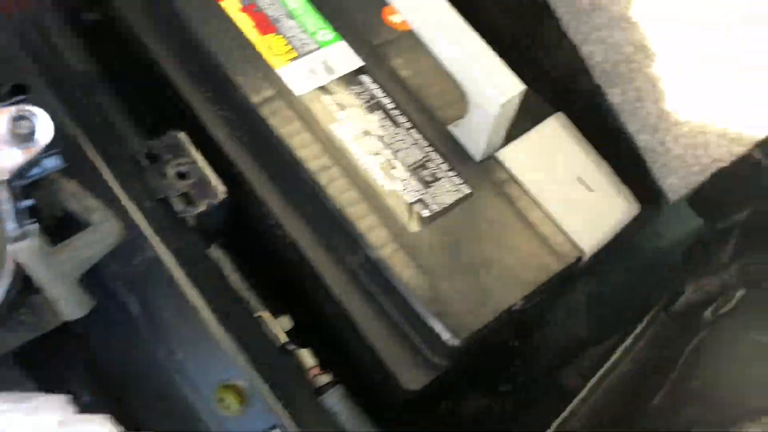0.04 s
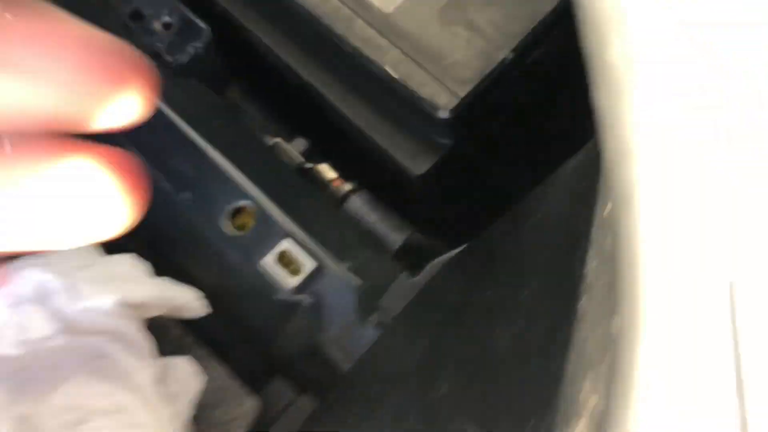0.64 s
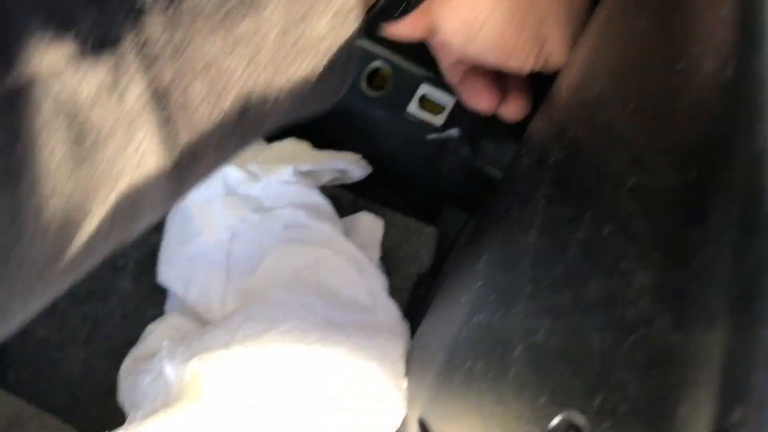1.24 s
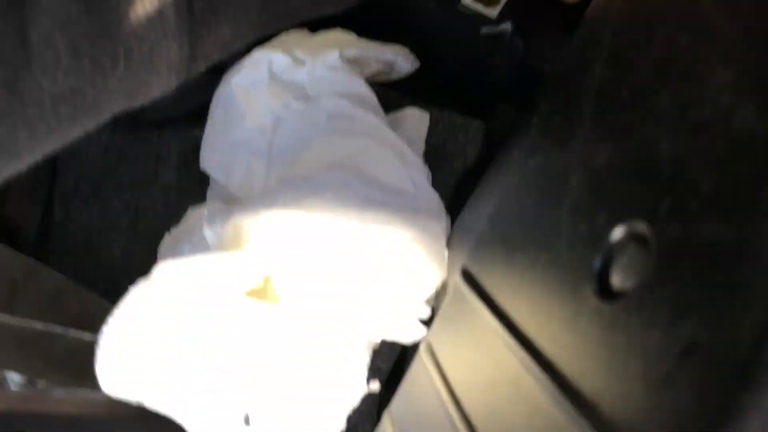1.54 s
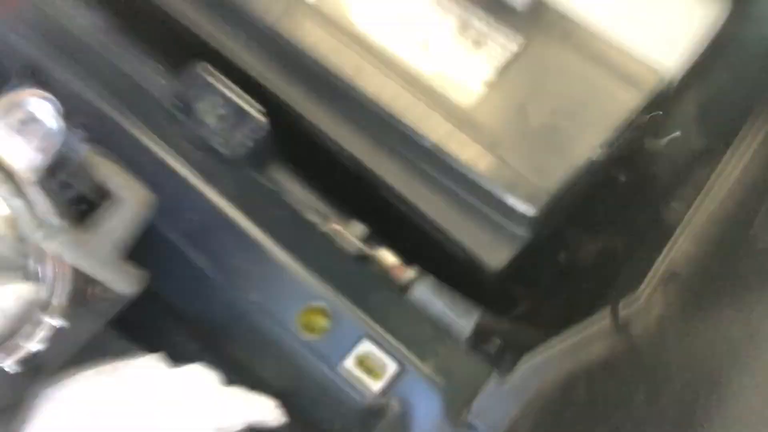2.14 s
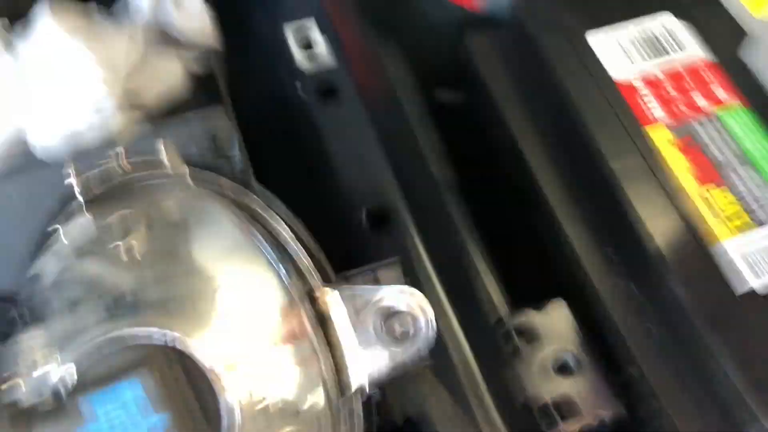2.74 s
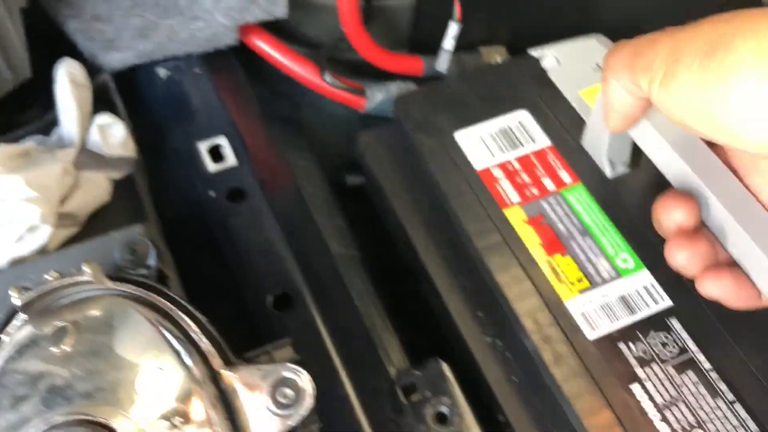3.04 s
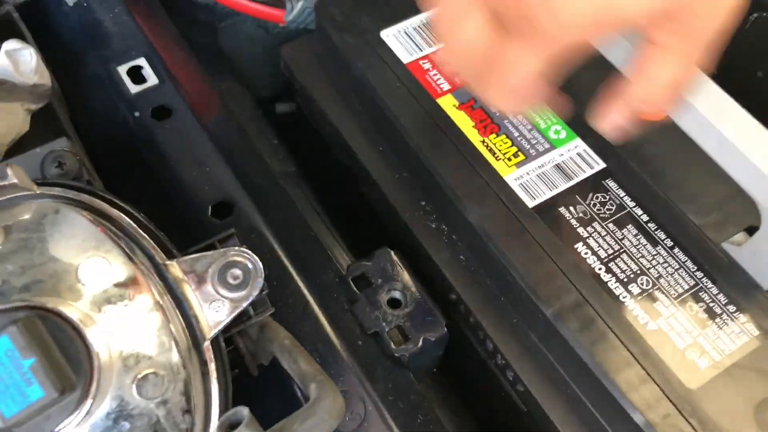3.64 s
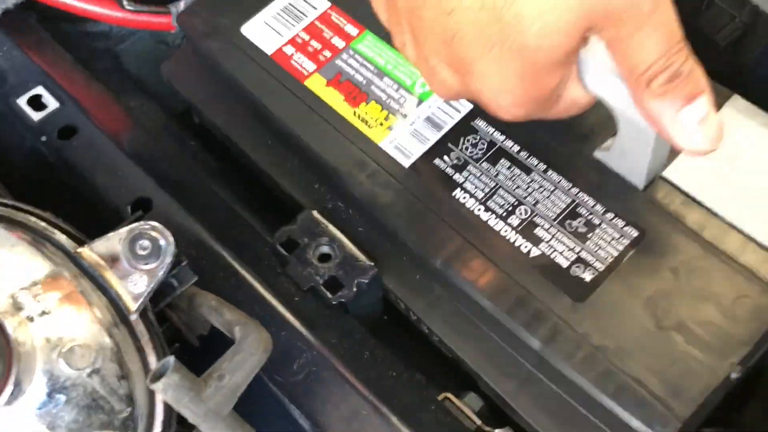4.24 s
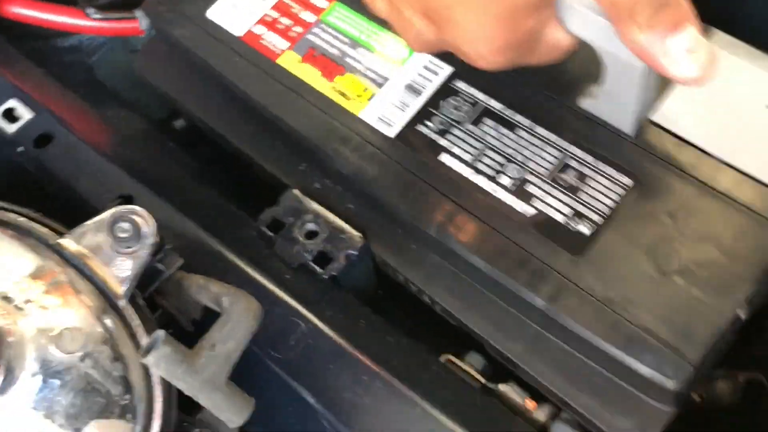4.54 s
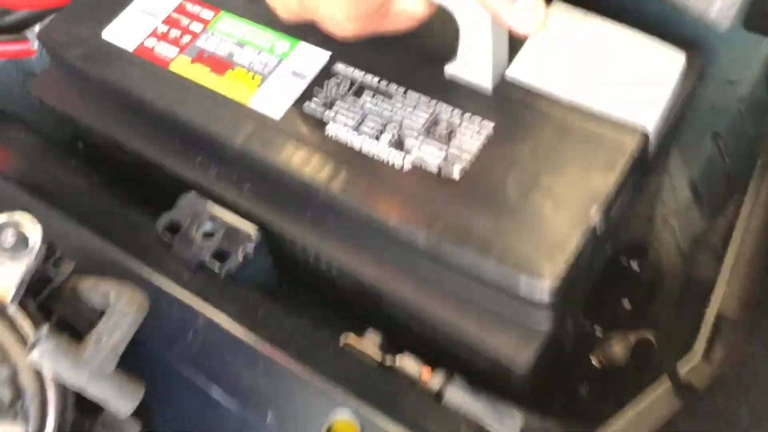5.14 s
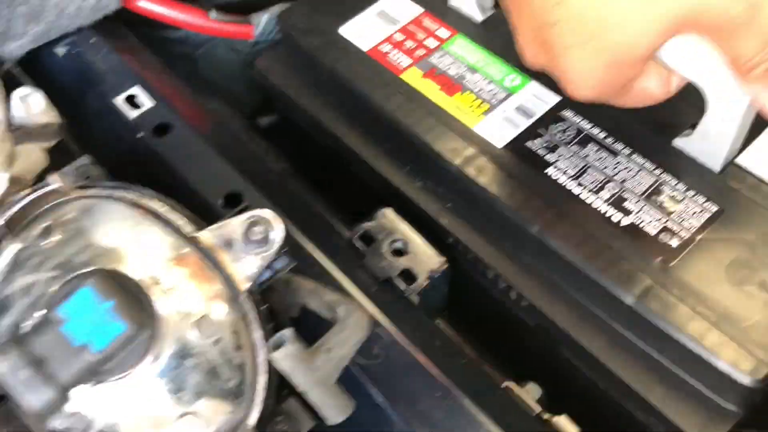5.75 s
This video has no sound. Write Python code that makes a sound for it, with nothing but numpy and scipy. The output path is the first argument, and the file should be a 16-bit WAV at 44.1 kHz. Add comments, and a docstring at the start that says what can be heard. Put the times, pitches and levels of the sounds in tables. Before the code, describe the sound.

Hands knock and rub on plastic trim in an engine bay, then a heavy car battery is set down with two thuds.

```python
"""A heavy car battery is lifted by its handle and set into its tray in an open engine bay.
Hands brush and knock on plastic trim, a panel creaks in stick-slip and hard edges snap. The battery
lands twice, rocking on its edges: the tray thumps, the case clacks, a metal fitting pings and the
body panels hum on. Short, dull bay reflections surround the contacts, over faint outdoor air."""
import sys
import numpy as np
from scipy import signal
from scipy.fft import rfft, irfft
from scipy.io import wavfile
from scipy.ndimage import uniform_filter1d

SR = 44100
rng = np.random.default_rng(int(sys.argv[2]) if len(sys.argv) > 2 else 0)


def to_wav(s):
    """Save 16-bit WAV."""
    ch = np.atleast_2d(s).T  # columns
    pcm = np.round(np.clip(ch, -1, 1) * 32767)  # PCM
    wavfile.write(sys.argv[1], SR, pcm.astype(np.int16))


N = 255339
T = np.arange(N) / SR
HIT = T[:SR // 2]  # time axis of a one-shot

# the two landings: touch_s, settle_s, full_weight_s, low_hum_db, mid_hum_db, high_hum_db
LANDINGS = [(4.251, 0.0055, 4.33, -22.5, -43.5, -41), (5.185, 0.05, 5.214, -21.5, -28.5, -38.5)]


def undb(db):
    """Decibels to gain."""
    return 10 ** (np.asarray(db) / 20)


def fade(t, t60):
    """Exponential decay that loses 60 dB in t60."""
    return np.exp(-np.log(1000) * t / t60)


def level(x, db, size=None):
    """Set the rms of the first samples (or of all)."""
    return x * undb(db) / np.sqrt(np.mean(x[:size] ** 2) + 1e-20)


def hump(hz, centre_hz, q):
    """Gain of a band-pass resonance."""
    ratio = np.maximum(hz, 1) / centre_hz
    return 1 / np.sqrt(1 + (q * (ratio - 1 / ratio)) ** 2)


def colour(x, gain, size=4096):
    """Minimum-phase EQ with the given gain curve, built from its cepstrum."""
    hz = np.arange(size // 2 + 1) * SR / size
    cepstrum = irfft(np.log(gain(hz) + 1e-6))
    cepstrum[1:size // 2] *= 2
    cepstrum[size // 2 + 1:] = 0
    return signal.fftconvolve(x, irfft(np.exp(rfft(cepstrum))))[:len(x)]


def spectrum(points):
    """EQ curve through (Hz, dB) points."""
    hz, db = np.transpose(points)
    return lambda f: undb(np.interp(np.log(f + 1), np.log(hz), db))


def ripple(depth_db, spacing_hz):
    """EQ curve of chance peaks and dips."""
    db = depth_db * rng.standard_normal(400)
    return lambda f: undb(np.interp(f / spacing_hz, np.arange(len(db)), db))


def walk(per_s):
    """A slow random wander with a spread near 1."""
    knots = np.linspace(0, T[-1], int(per_s * T[-1]) + 2)
    return np.interp(T, knots, rng.standard_normal(len(knots)))


def ring(modes, t=HIT):
    """Struck modes; neighbours swing in opposite directions."""
    return sum((-1) ** k * undb(db) * np.sin(2 * np.pi * hz * t) * fade(t, t60)
               for k, (hz, db, t60) in enumerate(modes))


def burst(t60):
    """Countless overlapping modes: noise that dies away."""
    return rng.standard_normal(len(HIT)) * fade(HIT, t60)


def add(out, s, x):
    """Mix a sound in at time s."""
    start = int(s * SR)
    out[start:start + len(x)] += x[:N - start]


def impacts(hits, thump_hz_at, modes, modes_db, thump_q, thump_noise_db, clack_q, clack_t60,
            crack_t60, crack_top_hz, uneven_db):
    """Each hit is three layers: a tray thump, a plastic clack and a crack at the touching edge."""
    # tray modes: pitch_hz, level_db, t60_s
    tray_modes = [(114.8, 4.5, 0.26), (135, -9.5, 0.16), (152, 3, .16), (202.3, 5, 0.23),
                  (248.3, -0.5, 0.098), (288, 6, 0.084), (340.6, 3, .17), (443, -4.5, 0.026)]
    # EQ of the edge crack: frequency_hz, gain_db
    crack_eq = [(500, -17), (1800, 2.5), (3500, 8), (6000, 5), (10000, 3.5), (16000, -1)]
    crack_tone = lambda f: spectrum(crack_eq)(f) / np.hypot(1, (f / crack_top_hz) ** 4)
    tray, plastic = ring(tray_modes), level(ring(modes), 0, size=512)
    thump_attack = 1 - np.exp(-HIT / 0.00081)
    out = np.zeros(N)
    for s, thump_db, clack_db, clack_hz, crack_db, contact_s in hits:
        thump_hz = thump_hz_at(s)
        thud = colour(burst(0.15), lambda f: hump(f, thump_hz, 1.44) ** 2)
        boom = colour(tray, lambda f: hump(f, thump_hz, thump_q))
        thump = level(boom, 0, size=1024) + level(thud, thump_noise_db, size=1024)
        add(out, s, level(thump * thump_attack, thump_db, size=1024))

        # a glancing contact builds slowly and rings longer, a square one speaks at once
        attack = 1 - np.exp(-HIT / contact_s)
        t60 = clack_t60 * (contact_s / .001) ** 0.4
        clack_tone = lambda f: hump(f, clack_hz, clack_q) ** 2
        # each point of contact favours other modes
        dense = colour(burst(t60), ripple(uneven_db, spacing_hz=109.14))
        clack = level(colour(dense, clack_tone), 0, size=384)
        clack += level(colour(plastic, clack_tone), modes_db, size=384)
        add(out, s, level(clack * attack, clack_db, size=384))

        crack = colour(burst(crack_t60), ripple(uneven_db, spacing_hz=259.2))
        add(out, s, level(colour(crack, crack_tone) * attack, crack_db, size=256))
    return out


def air(murmur_trim_db=0.5, hiss_trim_db=2, flicker_db=1.85, shimmer_db=5):
    """Outdoor bed: rumble and distant murmur swell and flicker; a faint hiss keeps shifting colour."""
    # levels of murmur and hiss before, between and after the landings: time_s, murmur_db, hiss_db
    air_levels = [
        [(0.0, -61, -80), (0.29, -65, -68.5), (0.53, -62.5, -65), (1.03, -56.5, -68), (1.24, -62, -73.5),
         (1.78, -57.5, -71.5), (2.05, -61.5, -74), (2.26, -65, -76), (2.4, -62, -68.5), (2.74, -67.5, -71.5),
         (2.94, -59.5, -65.5), (3.26, -59, -65.5), (3.65, -62.5, -64), (3.97, -66.5, -74), (4.2, -62.5, -77)],
        [(4.62, -65.5, -81), (4.82, -63.5, -76), (5.08, -65, -76.5)],
        [(5.4, -63, -61), (5.722, -64.5, -64), (5.79, -63.5, -64.5)],
    ]
    # fader ride of the rumble: time_s, level_db
    rumble_ride = [(0, -57.5), (.85, -53.5), (1.3, -58.5), (2.4, -60), (2.6, -56), (3.2, -54.5),
                   (3.75, -52), (4.05, -55), (5.79, -55.5)]
    # EQ of each layer: frequency_hz, gain_db
    rumble_eq = [(20, -36), (38, -9), (56, 11), (80, -0.5), (140, 0.5), (220, -19.5), (400, -28),
                 (900, -66)]
    murmur_eq = [(100, -25), (250, 15), (500, 5.5), (1100, 6), (1900, 0), (3000, -15), (6000, -27)]
    hiss_eq = [(800, -14), (2200, -2.5), (3100, -1), (3650, 1), (3950, -0.5), (4400, -2), (5200, -7),
               (6800, -7.5), (9000, -11), (13000, -11.5), (16000, -10.5)]
    s, murmur_db, hiss_db = np.vstack(air_levels).T
    shimmer = np.zeros(N)
    for _ in range(7):
        strand = colour(rng.standard_normal(N), ripple(depth_db=5.5, spacing_hz=171))
        shimmer += strand * undb(shimmer_db * walk(per_s=11))
    shimmer /= np.sqrt(uniform_filter1d(shimmer ** 2, size=4096))  # hold the level, let the colour move
    layers = [(rng.standard_normal(N), rumble_eq, np.interp(T, *np.transpose(rumble_ride))),
              (rng.standard_normal(N), murmur_eq, np.interp(T, s, murmur_db) + murmur_trim_db),
              (shimmer, hiss_eq, np.interp(T, s, hiss_db) + hiss_trim_db)]
    return sum(level(colour(noise, spectrum(eq)), db + flicker_db * walk(per_s=20))
               for noise, eq, db in layers)


def rubs(grain_db=3):
    """Swells of tiny uneven catches as sleeve, fingers and case slide over plastic."""
    # slides: peak_s, half_length_s, level_db, centre_hz
    slides = [(0.004, 0.047, -58.5, 3500), (0.965, 0.013, -54, 2330), (1.098, 0.026, -45.5, 2100),
              (1.185, 0.015, -54.5, 2060), (1.86, 0.013, -51.5, 1650), (2.251, 0.014, -51, 4140),
              (2.324, 0.019, -54.5, 4650), (2.434, .025, -62, 6540), (2.873, 0.012, -55, 3430),
              (3.06, 0.034, -57.5, 1980), (3.522, 0.07, -58.5, 4270), (3.599, 0.0068, -48.5, 5070),
              (3.808, 0.028, -56, 3900), (4.398, 0.012, -55, 5000), (4.445, 0.0072, -56, 7000),
              (5.122, 0.018, -57, 7600), (5.159, 0.031, -53, 895)]
    out = np.zeros(N)
    for peak_s, half_s, db, hz in slides:
        grip = np.repeat(rng.standard_normal(len(HIT)), 32)[:len(HIT)]
        grains = rng.standard_normal(len(HIT)) * undb(grain_db * grip)
        catches = colour(grains, ripple(depth_db=2.3, spacing_hz=216.0))
        friction = colour(catches, lambda f: hump(f, hz, q=0.52) ** 2)
        start = max(peak_s - 3 * half_s, 0)
        swell = np.exp(-.5 * ((start + HIT - peak_s) / half_s) ** 2)
        add(out, start, level(friction, db) * swell)
    return out


def creak(start_s=.450, release_s=.532, slip_db=-41.5, grit_db=-1, count=9,
          gap_s=.0052, slowing=1.11, jitter_s=.0019, scatter_db=3):
    """Stick-slip: ever slower slips ring a thin trim panel with a little grit, then it lets go."""
    # panel modes: pitch_hz, level_db, t60_s
    panel_modes = [(720, 2.5, 0.038), (900, 3, 0.027), (1210, 6.5, 0.02), (1790, 4.5, 0.021),
                   (2610, -5, 0.047)]
    late, force = rng.standard_normal((count, 2)).T
    gaps = gap_s * slowing ** np.arange(count)
    times = start_s + np.cumsum(gaps) - gaps + jitter_s * late
    out = np.zeros(N)
    for s, db in [*zip(times, slip_db + scatter_db * force), (release_s, slip_db)]:
        slip = level(ring(panel_modes), 0, size=192) + level(burst(0.03), grit_db, size=192)
        slip = colour(slip, lambda f: hump(f, centre_hz=960, q=0.3) ** 2)
        add(out, s, level(slip, db, size=192))
    return out


def taps(from_s=.55, to_s=3.5, count=9, thump_db=-70, clack_db=-62, clack_hz=600, crack_db=-85,
         contact_s=0.0037, scatter_db=4, scatter_octaves=0.32):
    """Hit list of faint finger taps on the trim, each at a chance moment in its own time slot."""
    slot_s = (to_s - from_s) / count
    when, force, place = rng.uniform(-1, 1, (count, 3)).T
    times = from_s + slot_s * (np.arange(count) + (when + 1) / 2)
    centres_hz = clack_hz * 2 ** (scatter_octaves * place)
    return [(s, thump_db + accent_db, clack_db + accent_db, hz, crack_db, contact_s)
            for s, accent_db, hz in zip(times, scatter_db * force, centres_hz)]


def knocks():
    """Hand, handle and case knock lightly on plastic, with finger taps scattered among them."""
    # knocks: start_s, thump_db, clack_db, clack_hz, crack_db, contact_s
    hits = [(.626, -71, -52.5, 500, -78, 0.0015), (1.080, -38.5, -50, 850, -51, 0.019),
            (1.1404, -32.5, -29, 1280, -37, 0.0017), (1.295, -56.5, -56, 520, -83, 0.0011),
            (1.384, -59, -54.5, 1720, -52.5, 0.0044), (1.460, -60, -48.5, 1530, -62, 0.0055),
            (1.648, -46, -41.5, 1210, -45, 0.00094), (1.661, -55.5, -50.5, 1110, -43, 0.00018),
            (1.8185, -52.5, -48, 1090, -44, 0.013), (2.217, -48, -53, 1180, -45.5, 0.00082),
            (2.229, -63, -48.5, 870, -46, 0.0002), (2.404, -57, -43.5, 720, -60, 0.00069),
            (2.696, -71, -52.5, 510, -72, 0.0016), (2.759, -48, -41, 1570, -68, 0.001),
            (2.775, -35.5, -45.5, 950, -46.5, 0.0056), (2.787, -37.5, -51, 800, -55, 0.0022),
            (2.812, -47.5, -52, 750, -65, 0.0035), (2.967, -70, -44.5, 2490, -78, .0014),
            (3.001, -48, -46.5, 1400, -51.5, 0.0051), (3.173, -61, -47.5, 1900, -58, 0.0025),
            (3.275, -60, -46.5, 940, -80, 0.004), (3.401, -59, -54, 1190, -56, 0.0055),
            (3.541, -50, -42.5, 2760, -57, 0.005), (4.090, -60, -54, 1070, -72, 0.0018),
            (5.548, -32.5, -38, 680, -72, 0.0027), (5.6195, -38.5, -42.5, 753, -79, 0.0021)]
    # the thump deepens as the hands move from light trim to the heavy battery: time_s, centre_hz
    deepening = [(1.1, 280), (2.8, 206), (5.6, 178)]
    # plastic trim modes: pitch_hz, level_db, t60_s
    trim_modes = [(520, 23, 0.039), (716, 3.5, 0.14), (1038, -10, 0.027), (1300, -17, 0.068),
                  (2040, -3.5, 0.017), (2530, -3, 0.044), (3170, -1, 0.053), (3600, 3, 0.072)]
    return impacts(hits + taps(), lambda s: np.interp(s, *np.transpose(deepening)), trim_modes,
                   modes_db=-8.5, thump_q=3.1, thump_noise_db=4, clack_q=0.77, clack_t60=0.037,
                   crack_t60=0.013, crack_top_hz=19000, uneven_db=3.5)


def snaps(edge_hz=4080, edge_db=-6):
    """Hard plastic snaps home: a sharp, dry tick, coloured by the ring of the stiff edge."""
    # ticks: start_s, level_db, centre_hz, q, t60_s
    ticks = [(1.033, -47.5, 6500, 5.2, 0.0068), (4.3831, -25, 5580, 0.13, 0.027),
             (4.4314, -35, 5130, 0.51, 0.021), (4.512, -60, 10000, 1.6, 0.04),
             (4.702, -57.5, 3370, 1.5, 0.024), (4.87, -64.5, 2960, 0.69, 0.043)]
    out = np.zeros(N)
    for s, db, hz, q, t60 in ticks:
        tick = level(colour(burst(t60), lambda f: hump(f, hz, q) ** 2), 0, size=128)
        edge = level(colour(tick, lambda f: hump(f, edge_hz, q=7)), edge_db, size=128)
        add(out, s, level(tick + edge, db, size=128))
    return out


def thump_pitch(s, touch_hz=246, seated_hz=130):
    """From each first touch the thump sinks as the tray takes the weight."""
    since_s, settle_s = min((abs(s - touch), settle) for touch, settle, *_ in LANDINGS)
    return seated_hz + (touch_hz - seated_hz) * np.exp(-since_s / settle_s)


def battery():
    """The battery rocks into its tray: two clusters of heavy hits from the edges of its case."""
    # edge hits: start_s, thump_db, clack_db, clack_hz, crack_db, contact_s
    hits = [(4.249, -33, -35, 1170, -59, 0.0034), (4.253, -20.5, -34, 490, -53, 0.0017),
            (4.265, -20, -27.5, 340, -48.5, 0.0015), (4.294, -21, -35, 960, -60, 0.0029),
            (4.3145, -24, -25, 790, -40.5, .0004), (4.328, -33, -32.5, 746, -43.5, 0.00069),
            (4.356, -31.5, -42.5, 600, -53, 0.014), (4.380, -28.5, -37.5, 820, -69, 0.0029),
            (4.460, -34, -50.5, 530, -82, .006), (4.538, -39, -75, 400, -85, 0.0025),
            (5.1625, -37, -32, 1320, -42, 0.0036), (5.187, -27.5, -21.5, 1350, -30.5, 0.0022),
            (5.194, -17, -13.5, 795, -44, 0.00031), (5.201, -17, -30.5, 460, -42, 0.0018),
            (5.221, -30, -28.5, 383, -41, 0.0017), (5.233, -24, -22.5, 728, -47, 0.00048),
            (5.2435, -14, -32, 1290, -37.5, 0.0033), (5.266, -45, -32.5, 1710, -39.5, 0.0031),
            (5.284, -27, -43, 850, -54, .0005), (5.305, -53, -50, 594, -49, .001)]
    # battery case modes: pitch_hz, level_db, t60_s
    case_modes = [(318, -10, 0.15), (424, 8.5, 0.18), (564.5, -2, 0.25), (608, 1.5, 0.16), (734, 4, 0.064),
                  (774, -5, 0.15), (852, 1.5, 0.089), (919, -13, 0.5), (1024, -1, 0.095), (1088, -2, 0.06),
                  (1264, 5, 0.063), (1400, -0.5, 0.061), (1682, -28, 0.32), (1870, -4, 0.1),
                  (2400, -5, 0.084), (2835, 2, 0.114)]
    return impacts(hits, thump_pitch, case_modes,
                   modes_db=-1.5, thump_q=3.0, thump_noise_db=0.5, clack_q=0.97, clack_t60=0.069,
                   crack_t60=0.058, crack_top_hz=11900, uneven_db=2.5)


def body_hum(attack_s=0.011, twin_ratio=1.035, twin_db=-13):
    """The car's sheet metal hums on under the weight, each mode beating against a weaker twin."""
    # body panel modes: pitch_hz, level_db, t60_s
    body_modes = [(59, 0, 0.58), (108.8, 0, 1.51), (180.8, 0, 2.68)]
    attack = 1 - np.exp(-T / attack_s)
    out = np.zeros(N)
    for _, _, s, *hum_db in LANDINGS:
        for (hz, mode_db, t60), db in zip(body_modes, hum_db):
            tone = ring([(hz, mode_db, t60)], T)
            twin = ring([(hz * twin_ratio, mode_db + twin_db, t60)], T)
            add(out, s, level(tone + twin, db, size=1024) * attack)
    return out


def fitting():
    """The second landing jolts a small metal fitting into short, very high pings."""
    # jolts: start_s, level_db
    jolts = [(5.2475, -46), (5.256, -38), (5.304, -54.5)]
    # fitting modes: pitch_hz, level_db, t60_s
    metal_modes = [(6940, -3.5, 0.08), (9100, -7, 0.076), (9660, 2, 0.077)]
    out = np.zeros(N)
    for s, db in jolts:
        add(out, s, level(ring(metal_modes), db, size=512))
    return out


def bay(x, t60=0.25, build_s=0.0069, wet_db=-3.48):
    """Dense, dull reflections between the panels of the engine bay."""
    tail = burst(t60) * (1 - np.exp(-HIT / build_s))
    tail = colour(tail, lambda f: hump(f, centre_hz=700, q=0.32))
    tail /= np.abs(rfft(tail)).max()
    return x + undb(wet_db) * signal.fftconvolve(x, tail)[:N]


def scene():
    """All contacts sound in the bay; the body hum and outdoor air stay dry."""
    contacts = battery() + knocks() + snaps() + fitting() + creak() + rubs()
    return (bay(contacts) + body_hum() + air())[None]


def record(dry, low_hz=34, ceiling=.52, top_hz=15750):
    """A close phone thins the deepest bass, rounds the loudest peaks and cuts the top."""
    thin = signal.sosfilt(signal.butter(3, low_hz, "highpass", fs=SR, output="sos"), dry)
    rounded = thin / (1 + (thin / ceiling) ** 4) ** (1 / 4)
    return signal.sosfilt(signal.ellip(8, .2, 70, top_hz, fs=SR, output="sos"), rounded)


dry = scene()
out = record(dry)
to_wav(out)
```